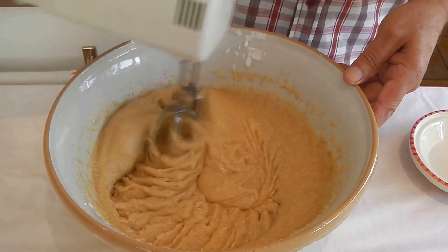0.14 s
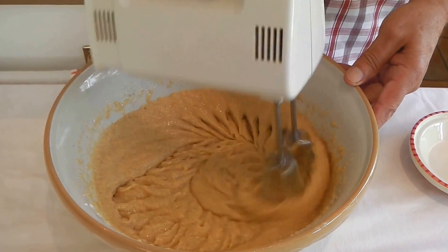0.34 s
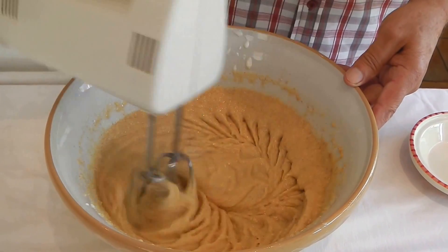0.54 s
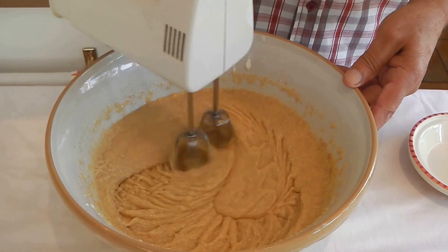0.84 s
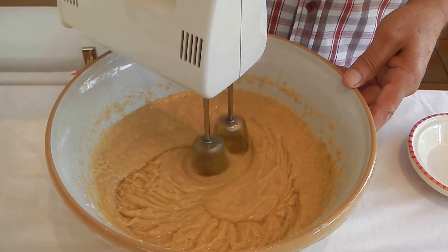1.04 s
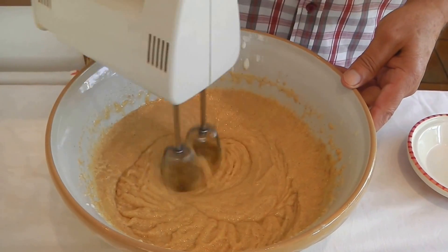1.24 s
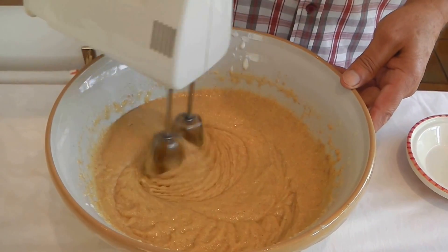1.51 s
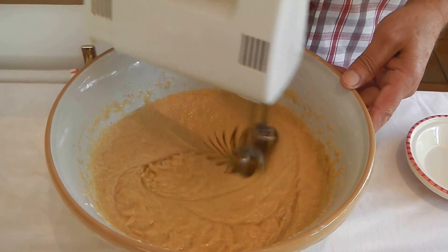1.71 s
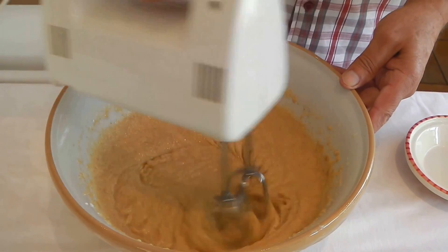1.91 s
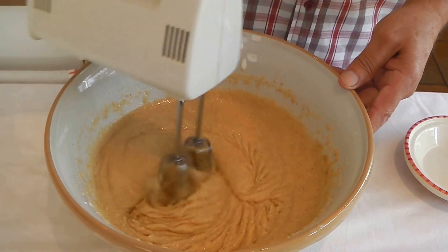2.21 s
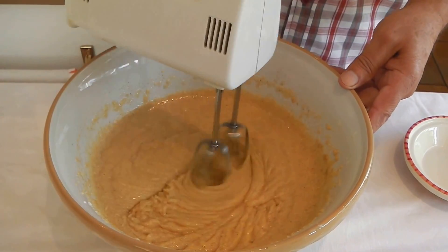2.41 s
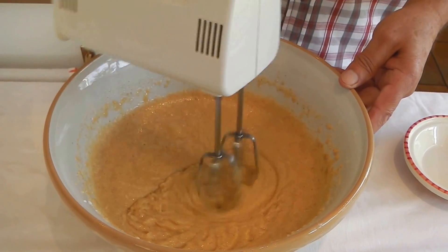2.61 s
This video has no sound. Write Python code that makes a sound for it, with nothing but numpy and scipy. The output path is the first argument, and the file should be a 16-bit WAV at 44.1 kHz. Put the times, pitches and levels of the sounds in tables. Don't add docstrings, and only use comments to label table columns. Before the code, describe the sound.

An electric hand mixer runs close up in a kitchen, its bright, buzzing whine wavering slightly over fan air and brush hiss. Beaters drag low through batter and rattle sharply on the ceramic bowl from 0.14 to 0.6 seconds. Steadier whirring follows, with duller-ringing ticks around 1.8 to 2.05. The switch snaps at 2.2 and 2.26; the whine slides down and softens, still turning at about 2.75.

```python
import sys
import numpy as np
from scipy import signal
from scipy.fft import rfft, irfft, next_fast_len
from scipy.io import wavfile
from scipy.ndimage import uniform_filter1d, minimum_filter1d

SR = 44100
rng = np.random.default_rng(int(sys.argv[2]) if len(sys.argv) > 2 else 0)


def magnitude_from_level(level_db):
    exponent = np.asarray(level_db, float) / 20
    return 10 ** exponent


def generate_wav(sig):
    pcm = np.round(np.clip(np.atleast_2d(sig).T, -1, 1) * 32767).astype(np.int16)
    wavfile.write(sys.argv[1], SR, pcm)


N = 121275
TOP_HZ = 15760

# [t/s, speed/(rev/s)]
SHAFT_SPEED = [(0, 224.2), (.2, 226), (.37, 228.6), (.6, 226.5), (.72, 228.3), (1, 232.3), (1.2, 232.9),
               (1.47, 230.6), (1.68, 232.2), (1.9, 228.9), (2.05, 227.5), (2.19, 227.3), (2.265, 220.5),
               (2.36, 196), (2.47, 169.5), (2.6, 138.5), (2.68, 122.5), (2.75, 111)]


def unit(x):
    return x / np.sqrt(np.mean(x ** 2) + 1e-20)


def along(points, hz):
    f, v = np.transpose(points)
    return np.interp(np.log(hz + 1), np.log(f + 1), v)


def curves(rows):
    s, *cols = np.transpose(rows)
    return [np.interp(np.arange(N) / SR, s, c) for c in cols]


def wobble(rate_hz, count=N):
    knots = rng.standard_normal(200)
    return np.interp(np.linspace(0, N / SR * min(rate_hz, 70), count), np.arange(len(knots)), knots)


def filtered(x, response):
    m = next_fast_len(x.shape[-1] + 8192)
    return irfft(rfft(x, m) * response(np.fft.rfftfreq(m, 1 / SR)), m)[..., :x.shape[-1]]


def resonance_db(hz, peaks):
    return sum(db / (1 + (2 * (hz - centre_hz) / width_hz) ** 2) for centre_hz, width_hz, db in peaks)


def spread(hz):
    # [f/Hz, left-right likeness]
    likeness = [(30, 0.87), (200, .92), (500, 0.95), (1800, 0.98), (3400, 0.88), (4300, 0.35), (6000, 0.4),
                (9000, .5), (15000, 0.45)]
    return np.arccos(np.clip(along(likeness, hz), -1, 1)) / 2


def rush(colour_db, patchy_db):
    z = signal.stft(rng.standard_normal((2, N)), nperseg=512)[2]
    field = uniform_filter1d(rng.standard_normal(z.shape[1:]), size=5, axis=0)
    field = uniform_filter1d(field, size=8, axis=1)
    pair = signal.istft(z * magnitude_from_level(patchy_db * unit(field)), nperseg=512)[1][:, :N]
    mid, side = filtered(pair, lambda hz: magnitude_from_level(colour_db(hz)) * [np.cos(spread(hz)), np.sin(spread(hz))])
    return unit(np.array([mid + side, mid - side]))


def burst(t60_s, colour_db, rise_s, blow=0):
    t = np.arange(SR // 10) / SR
    noise = rng.standard_normal(len(t)) + blow * (np.arange(len(t)) == round(2 * rise_s * SR))
    x = filtered(noise, lambda hz: magnitude_from_level(colour_db(hz)))
    x = x * magnitude_from_level(-60 * t / t60_s) * (1 - np.exp(-(t / rise_s) ** 2))
    return x / abs(x).max()


def order_levels(step, coast):
    multiples = [2, 6, 6.7, 7, 8, 12, 14, 19, 24, 36, 42, 43, 48, 53, 55, 60, 67, 72, 79, 84, 90, 96, 108,
                 120]
    driven_db = [-17, -33.5, -23.5, -14, -20.5, -15, -9, -16, -8, -9, -14, -9, -8, -12.5, -14, -3.5, -20,
                 -14, -16, -14, -15, -15, -16, -17]
    coast_db = [-50, -29, -50, -23, -29, -17, -31, -34, -23, -14, -29, -29, -15, -18, -20, -12, -17, -11,
                -13, -15, -11, -15, -16, -17]
    weak_db, weak_scatter_db = -23, 2
    levels = {k: weak_db + weak_scatter_db * rng.standard_normal() for k in range(28, 71)}
    for k, on, off in zip(multiples, driven_db, coast_db):
        levels[k] = on + (off - on) * coast
    return levels


def whine(turn, speed, air_db, hiss_db):
    # [f/Hz, width/Hz, gain/dB]
    shell = [(460, 21, -2), (570, 136, 11.5), (1057, 407, 14), (1540, 120, 5.5), (1900, 210, 6.5),
             (2290, 50, 7.5), (3030, 120, 2.5), (13400, 6400, -3)]
    # [f/Hz, width/Hz, gain/dB]
    passed = [(1060, 125, 24), (1470, 190, 20), (1960, 250, 16), (2440, 110, 13), (3050, 200, 3),
              (4750, 250, 12), (7000, 700, 3), (12300, 1800, 8), (15000, 1600, 13)]
    # [t/s, level/dB]
    vents = [(0, 1.5), (.12, 11), (.19, 9), (.23, 5.5), (.39, 8.5), (.5, 8), (.74, 6.5), (1.06, 9.5),
             (1.19, 5.5), (1.48, 14), (1.53, 9.5), (1.69, 11), (1.735, 5.5), (1.8, 10.5), (1.96, 5),
             (2.09, 11.5), (2.175, 14), (2.2, 5), (2.56, -1)]
    # [t/s, hum/dB, gear/dB, commutator/dB, whistle/dB]
    circling = [(0, -0.5, 6.5, -1, -7), (.17, -8, -5.5, -14, 5.5), (.37, 3, 3.5, 5, 3),
                (.68, -5, 6, 2.5, -7), (.92, 1, -6, 4, 7), (1.25, 3, 2.5, 1.5, 6), (1.4, 5.5, 2, 8, 0),
                (1.55, -6.5, -1, -1.5, 12), (1.7, 5, -6, 10.5, 3), (1.8, -1, -6, 3, 6),
                (2.03, 0.5, 6, 4, 2), (2.13, -2.5, -3.5, 0.5, -3), (2.27, 1, -1, -2, -14)]
    follows = {2: 0, 7: 1, 24: 2, 48: 2, 43: 3, 60: 3}
    blades, brush_orders_from = 14, 34
    off_s, fade_s = 2.27, .06
    sway_db, flutter_db, drift_hz = 3.5, -3, 4.84
    steered_sway, coast_steadies = .25, .7

    step = np.arange(0, N, 64)
    count = len(step)

    def fine(v):
        return np.interp(np.arange(N), step, v)

    coast = np.clip((step / SR - off_s) / fade_s, 0, 1)
    levels = order_levels(step, coast)
    levels[blades] = levels[blades] + curves(vents)[0][step]
    swings_db = curves(circling)
    for k, column in follows.items():
        levels[k] = levels[k] + (1 - coast) * swings_db[column][step]

    out = np.zeros((2, N))
    for k, db in levels.items():
        hz = k * speed[step]
        housing_db = (1 - coast) * resonance_db(hz, shell) + coast * resonance_db(hz, passed)
        brush_db = (k > brush_orders_from) * (hiss_db - air_db)[step]
        share = steered_sway if k in follows or k == blades else 1
        unsteady_db = share * (1 - coast_steadies * coast) * sway_db * wobble(7.98, count)
        unsteady_db = unsteady_db + flutter_db * wobble(60, count)
        gain = magnitude_from_level(db + housing_db + brush_db + unsteady_db) * (hz < TOP_HZ)
        drift = 2 * np.pi * drift_hz * np.cumsum(wobble(39.7, count)) * step[1] / SR
        drift = drift + rng.uniform(0, 2 * np.pi)
        skew = 1.86 * spread(hz) * wobble(5.05, count)
        out += fine(gain) * np.sin([k * turn + fine(drift + skew), k * turn + fine(drift - skew)])
    return out


def fan_air(shell):
    # [f/Hz, level/dB per Hz]
    air_colour = [(150, -67), (250, -32), (458, -18), (1310, -17.5), (1580, -11), (2120, -11.5),
                  (3160, -2.5), (3670, -9), (8500, -10.5), (11000, -39), (18700, -120)]
    off_s, slow_s = 2.27, 0.42
    hump_hz, hump_width_hz, hump_loss = 3320, 700, 0.75
    air = rush(lambda hz: along(air_colour, hz) + resonance_db(hz, shell), patchy_db=1.5)
    air = air * magnitude_from_level(.7 * wobble(11.4))
    slowed = np.clip((np.arange(N) / SR - off_s) / slow_s, 0, 1)
    hump = filtered(air, lambda hz: np.exp(-((hz - hump_hz) / hump_width_hz) ** 2))
    return air - hump_loss * slowed * hump


def brush_hiss(shell, turn):
    # [f/Hz, level/dB per Hz]
    hiss_colour = [(4410, -90), (7500, -106), (7800, -43), (9640, -4), (11700, -3), (14300, 4.5),
                   (16100, -1.5), (16500, -42)]
    hiss = rush(lambda hz: along(hiss_colour, hz) + resonance_db(hz, shell), patchy_db=0.5)
    return hiss * magnitude_from_level(1.4 * wobble(18)) * (1 + 0.22 * np.sin(turn))


def motor():
    # [t/s, air/dB, brush hiss/dB]
    load = [(0.0, -25, -25.5), (0.11, -23.5, -25), (0.34, -23, -29), (0.67, -26, -26.5),
            (1.0, -23.5, -26.5), (1.51, -24.5, -26.5), (1.7, -22, -26), (1.89, -23.5, -27.5),
            (2.11, -24, -25.5), (2.28, -24, -25), (2.56, -29, -32.5), (2.75, -31, -36.5)]
    # [f/Hz, width/Hz, gain/dB]
    shell = [(460, 21, -2), (570, 136, 11.5), (1057, 407, 14), (1540, 120, 5.5), (1900, 210, 6.5),
             (2290, 50, 7.5), (3030, 120, 2.5), (13400, 6400, -3)]
    speed, = curves(SHAFT_SPEED)
    air_db, hiss_db = curves(load)
    turn = 2 * np.pi * np.cumsum(speed) / SR
    tonal_and_air = fan_air(shell) + whine(turn, speed, air_db, hiss_db)
    return magnitude_from_level(air_db - 1.81) * tonal_and_air + magnitude_from_level(hiss_db + 1.0) * brush_hiss(shell, turn)


def beaters():
    # [t/s, level/dB]
    drag = [(0, -38.5), (.11, -53), (.14, -31.5), (.19, -43), (.39, -42), (.45, -52), (.49, -36.5),
            (.58, -38.5), (.72, -54), (1.43, -53), (1.47, -44.5), (1.57, -49.5), (1.61, -37.5),
            (1.72, -32.5), (1.88, -33.5), (1.94, -53), (1.98, -34.5), (2.42, -56.5)]
    # [f/Hz, level/dB per Hz]
    rumble = [(15, -44), (48, -3), (75, -5.5), (115, 6), (200, -2), (620, -4.5), (1200, -12), (3300, -120)]
    wires_per_turn, slap_db, idle_db = .2, 5, -64

    def colour_db(hz):
        return along(rumble, hz)

    drag_db, = curves(drag)
    wires = 2 * np.pi * np.cumsum(wires_per_turn * curves(SHAFT_SPEED)[0]) / SR
    slaps = magnitude_from_level(slap_db * np.cos(wires + 1.9) + 2.1 * wobble(16))
    dragging = magnitude_from_level(drag_db + 2.0) * unit(slaps * rush(colour_db, patchy_db=1.0))
    return dragging + magnitude_from_level(idle_db) * rush(colour_db, patchy_db=1.5)


def ticks():
    # [t/s, peak/dB, pitch/Hz, thud over the tick/dB, thud/Hz]
    hits = [(0.1393, -3.5, 1900, -8.5, 740), (0.164, -2.5, 4600, -15, 660), (.184, -9, 4500, 0, 1290),
            (0.2055, -1.5, 4600, -11, 1110), (0.2261, 6.5, 4060, -15, 1250), (0.2467, -3.5, 4200, -9, 1200),
            (0.269, 15.5, 4770, -13, 1200), (0.289, -4, 4170, -8.5, 695), (0.31, -7.5, 2140, -7, 920),
            (0.3868, 3, 4200, -11, 666), (0.4742, 0, 3230, -15, 720), (0.4965, -1, 3160, -17, 620),
            (0.552, 4, 3670, -14, 1200), (0.58, -3, 3030, -11.5, 566), (1.8309, 6.5, 2400, -14, 700),
            (1.9662, 2, 3230, -23, 614), (1.9886, 8, 3350, -28, 620), (2.0195, 4.5, 3300, -18.5, 610),
            (2.044, 2, 5400, -20, 460)]
    # [f/Hz, level/dB, t60/s]
    bowl = [(620, -3.5, 0.17), (1200, -27, .05), (2740, 1.5, 0.07), (3980, -10, 0.036), (4600, 3, 0.018),
            (5370, -8, 0.029), (5110, 0, 0.0098)]
    crack_t60_s, thud_t60_s, rise_s, blow = 0.033, 0.039, .0003, 14
    width_oct, top_db, top_db_per_octave = 0.62, -12.5, 38
    ring_db, covered_s, covered_db = -9, 1, -10

    def hump(hz, centre_hz):
        bell_db = -6 * (np.log2((hz + 1) / centre_hz) / width_oct) ** 2
        shelf_db = np.minimum(top_db + top_db_per_octave * np.log2(centre_hz / 4000), -6)
        return np.maximum(bell_db, shelf_db - 40 * (hz < centre_hz))

    out, t = np.zeros(N + SR), np.arange(SR // 10) / SR
    for s, db, pitch_hz, thud_db, thud_hz in hits:
        ring = np.zeros(len(t))
        for hz, level_db, t60_s in bowl:
            near_db = max(hump(hz, pitch_hz), thud_db + hump(hz, thud_hz))
            mode_db = level_db + near_db + rng.normal(0, 2.3)
            ring += magnitude_from_level(mode_db - 60 * t / t60_s) * np.sin(2 * np.pi * hz * t)
        crack = burst(crack_t60_s, lambda hz: hump(hz, pitch_hz), rise_s, blow)
        thud = burst(thud_t60_s, lambda hz: hump(hz, thud_hz) - 20 * (hz > 2 * thud_hz), 3 * rise_s)
        ring_gain = magnitude_from_level(ring_db + covered_db * (s > covered_s))
        out[round(s * SR):][:len(t)] += magnitude_from_level(db - 6.5) * (crack + ring_gain * ring + magnitude_from_level(thud_db) * thud)
    return out[:N]


def switch():
    # [t/s, peak/dB, pitch/Hz]
    snaps = [
        (2.1921, 0.5, 2700),
        (2.261, 3, 3400),
    ]
    # [f/Hz, level/dB]
    case = [(290, -30), (500, -11.5), (1090, -18), (1870, -18.5), (3550, -7.5), (8060, -21), (9190, -12),
            (15100, -14), (16500, -22)]
    out = np.zeros(N + SR)
    for s, db, pitch_hz in snaps:
        snap = burst(0.039, lambda hz: along(case, hz) + 8 / (1 + ((hz - pitch_hz) / 400) ** 2), rise_s=.0013)
        out[round(s * SR):][:len(snap)] += magnitude_from_level(db) * snap
    return out[:N]


def kitchen(x):
    # [f/Hz, t60/s]
    decay = [(200, 0.23), (2000, 0.14), (12000, 0.19)]
    hz, t, z = signal.stft(rng.standard_normal((2, SR // 2)), SR, nperseg=256)
    tail = signal.istft(z * magnitude_from_level(-60 * t / along(decay, hz)[:, None]), SR, nperseg=256)[1]
    late = np.pad(x, (100, 0))[None]
    return signal.fftconvolve(late, tail / np.linalg.norm(tail[0]), axes=1)[:, :N]


def scene():
    hits = ticks() + switch()
    return motor() + beaters() + hits + magnitude_from_level(-12) * kitchen(hits)


def roll_off(x):
    return signal.sosfilt(signal.butter(12, 16890, fs=SR, output="sos"), x)


def record(dry):
    # [f/Hz, left over right/dB]
    lean = [(60, -.3), (1200, -.4), (2800, 1.3), (5500, -1.9), (9500, -2.8), (14000, -1.9)]
    notch_hz, notch_width_hz, notch_depth = 7860, 450, .998
    ceiling_db, look_s, squeeze = -4.5, 0.025, 0.72

    def response(hz):
        notch = 1 - notch_depth * np.exp(-((hz - notch_hz) / notch_width_hz) ** 2)
        return notch * (hz < TOP_HZ) * magnitude_from_level(along(lean, hz) * np.array([[.5], [-.5]]))

    x = filtered(dry, response)
    look = round(look_s * SR)
    need = np.minimum(1, magnitude_from_level(ceiling_db) / (abs(x).max(0) + 1e-9)) ** squeeze
    gain = uniform_filter1d(minimum_filter1d(need, look), look // 2)
    return roll_off(np.clip(x * gain, -1, 1))


dry = scene()
out = record(dry)
generate_wav(out)
```